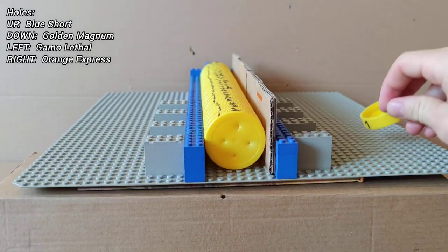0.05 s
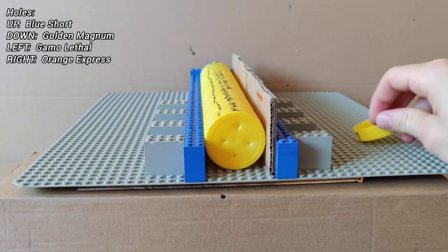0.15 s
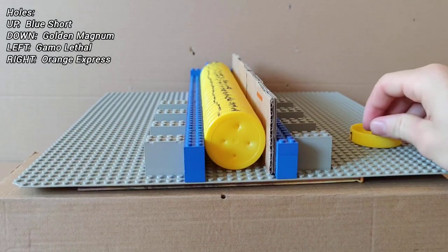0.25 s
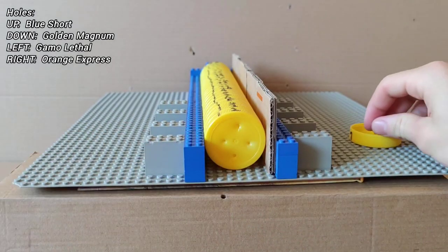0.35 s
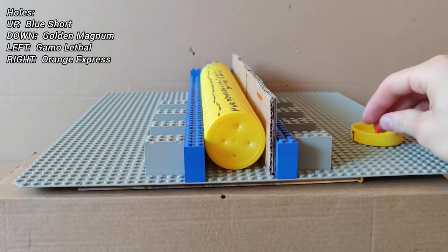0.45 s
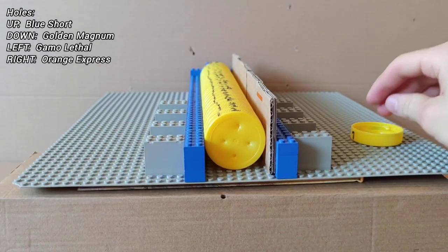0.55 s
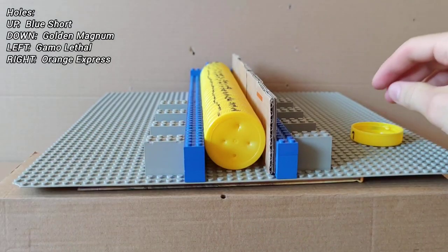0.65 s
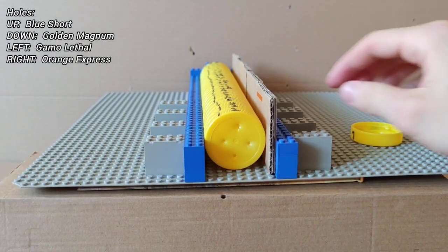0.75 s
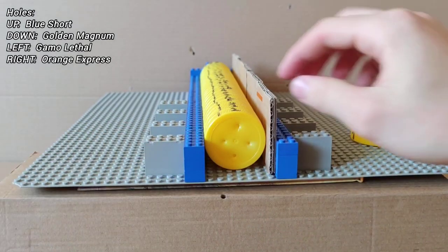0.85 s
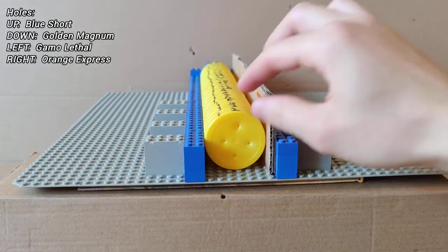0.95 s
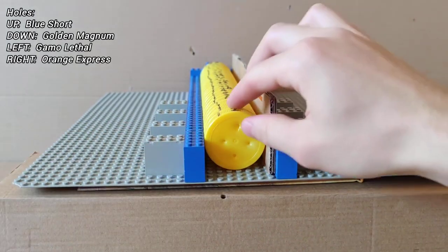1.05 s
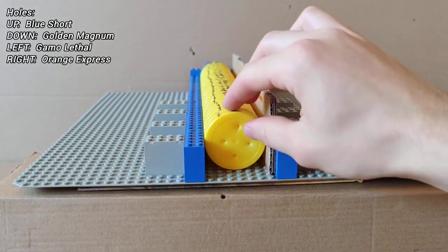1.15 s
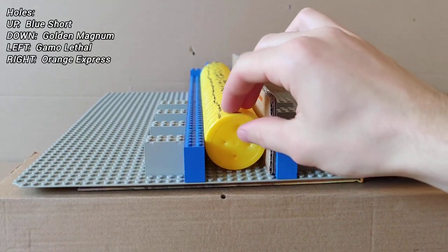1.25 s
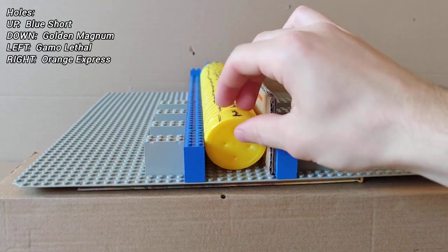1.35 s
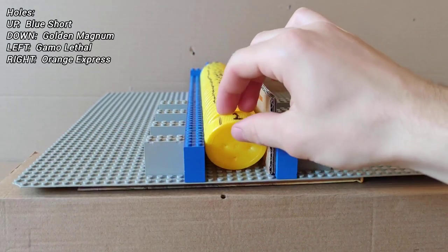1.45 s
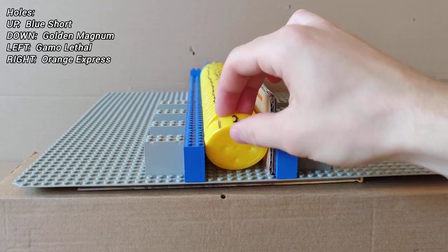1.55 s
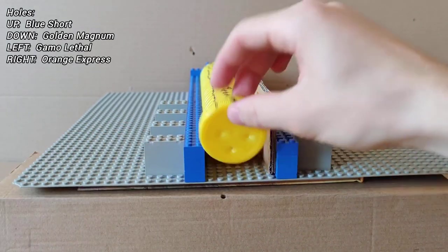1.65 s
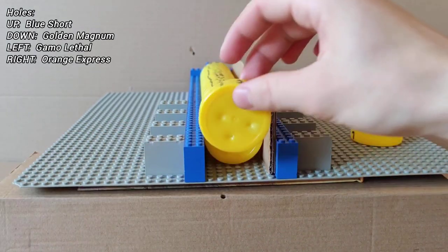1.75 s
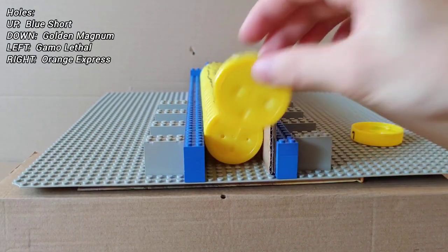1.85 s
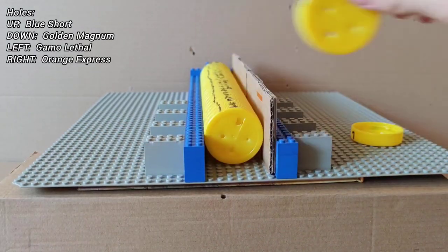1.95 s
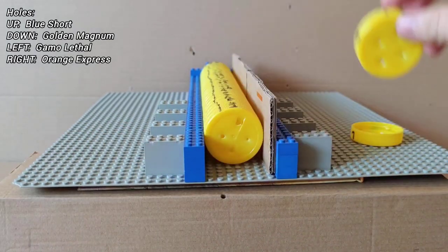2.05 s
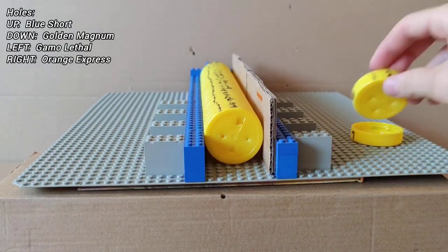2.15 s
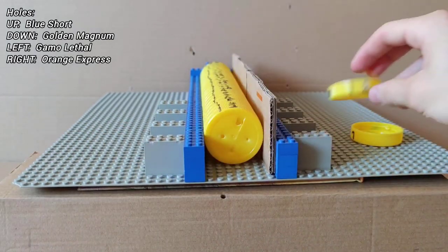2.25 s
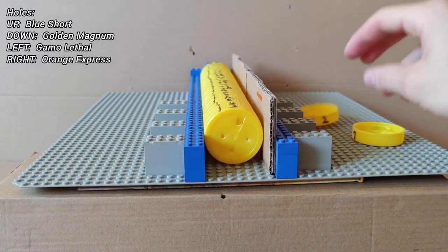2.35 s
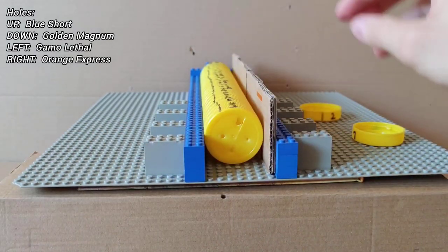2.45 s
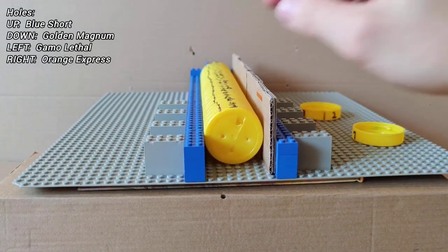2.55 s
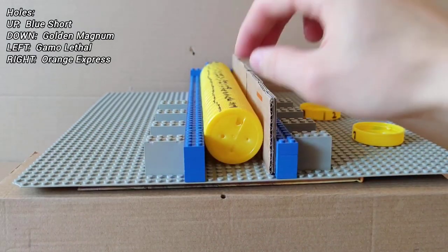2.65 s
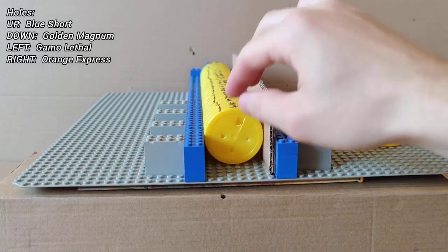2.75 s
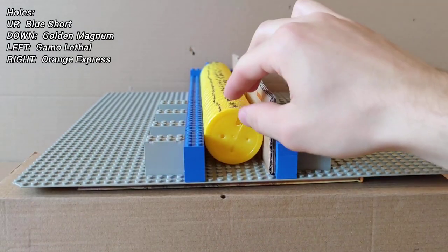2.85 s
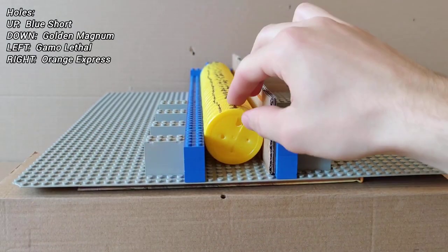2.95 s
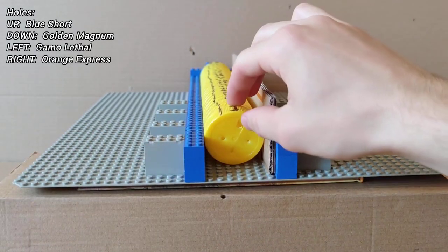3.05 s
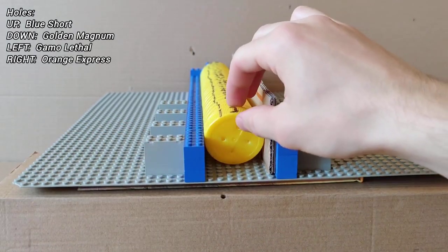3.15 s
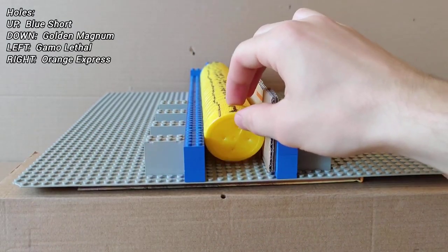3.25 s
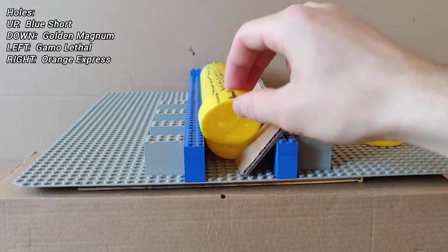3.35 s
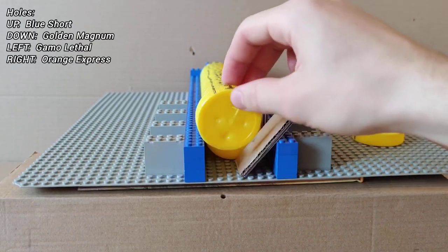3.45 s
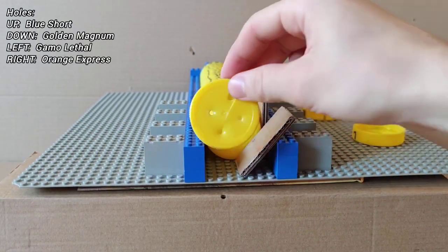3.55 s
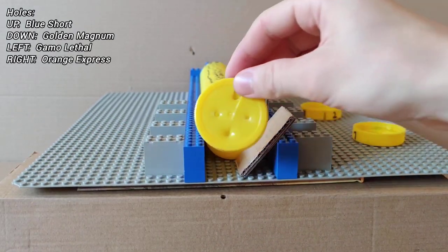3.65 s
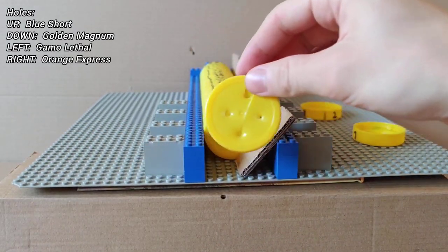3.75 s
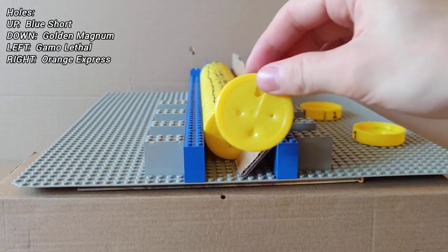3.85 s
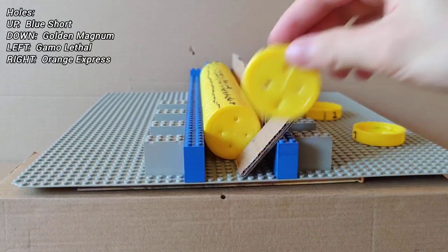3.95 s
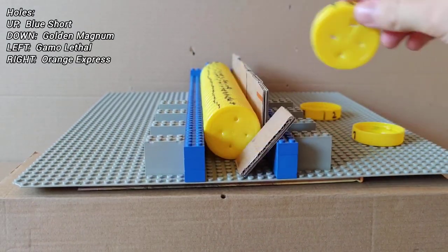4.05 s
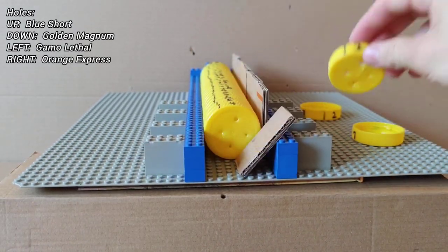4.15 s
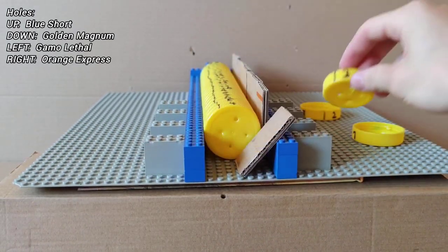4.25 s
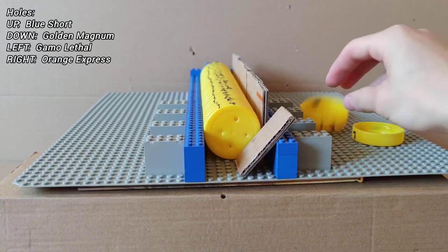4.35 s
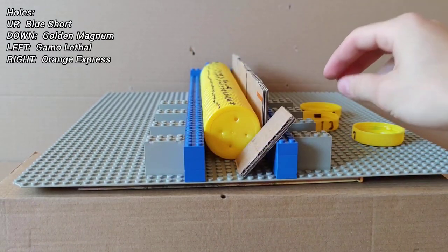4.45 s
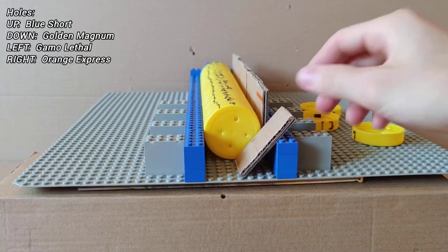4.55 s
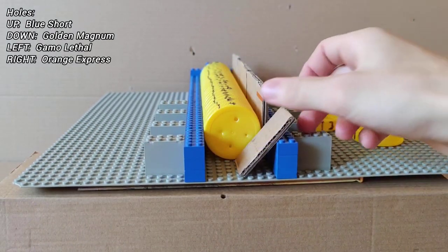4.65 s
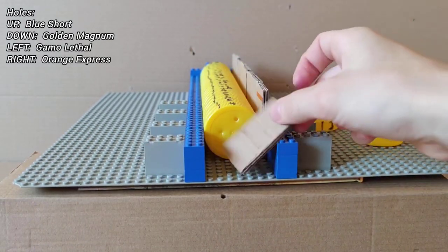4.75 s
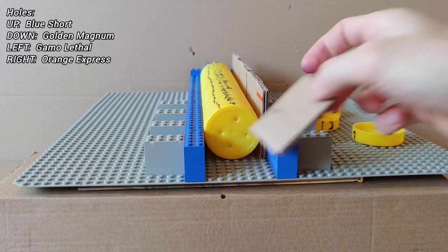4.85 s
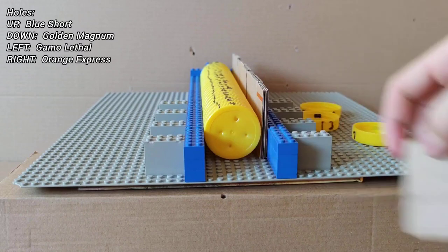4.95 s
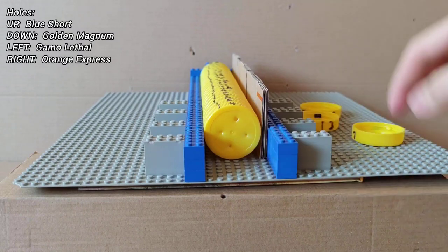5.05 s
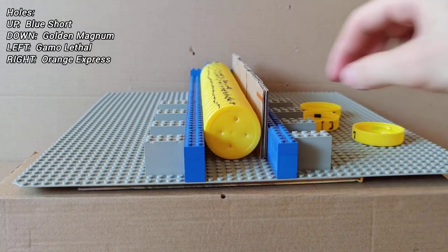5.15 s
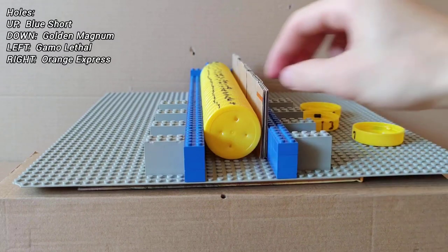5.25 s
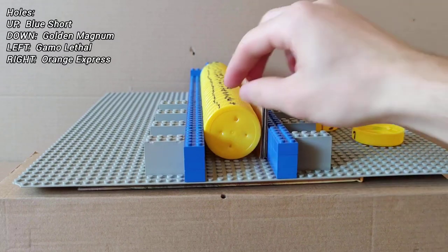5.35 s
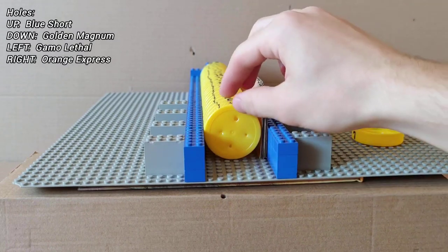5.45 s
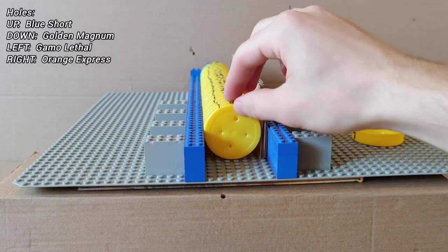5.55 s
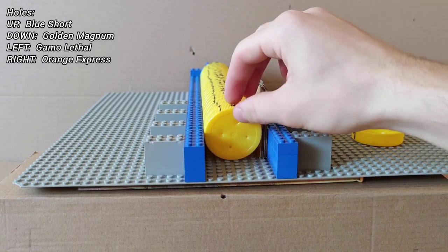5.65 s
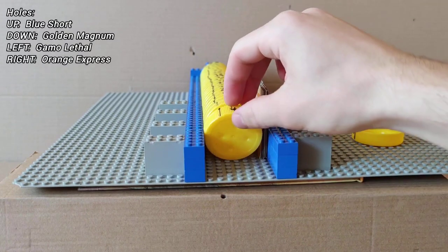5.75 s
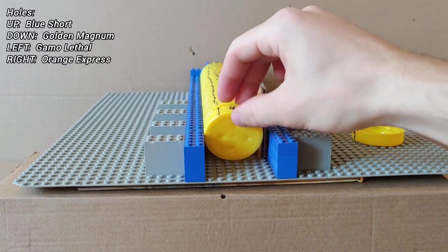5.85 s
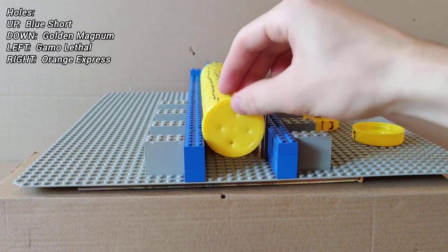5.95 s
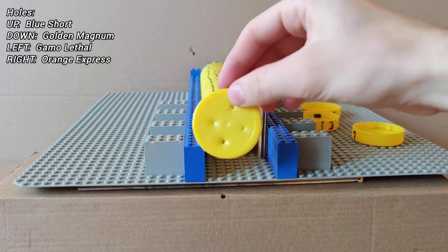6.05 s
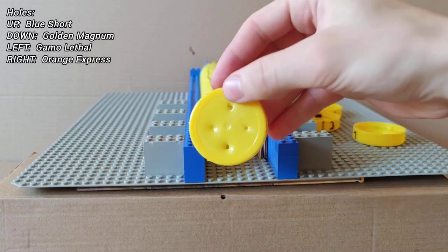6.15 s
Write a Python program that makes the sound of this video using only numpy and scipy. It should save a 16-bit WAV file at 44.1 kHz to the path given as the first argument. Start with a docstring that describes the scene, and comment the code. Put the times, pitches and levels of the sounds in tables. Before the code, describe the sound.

In a small, quiet room, light plastic caps land on a plastic baseplate three times, about two seconds apart, each with a bright, slightly hollow clatter. Between the landings come soft clicks and faint rubbing as fingers pull caps from a rack. Then something knocks and drags the stand of the nearby microphone, making dull, ringing thumps, and one more cap clicks and scrapes lightly over a faint steady hiss.

```python
"""Hard plastic caps, lifted from a rack by hand, drop on a plastic plate lying on a cardboard box.
Each contact rings cap, plate and box and ticks at the edge; rims scrape in grains, skin hisses along.
Something bumps and drags the camera stand, which thumps and rings. A small room answers.
The camera's two microphone ports differ in treble, over room murmur and their own hiss."""
import sys
import numpy as np
from scipy import signal
from scipy.fft import rfft
from scipy.io import wavfile
from scipy.ndimage import uniform_filter1d

SR = 44100
rng = np.random.default_rng(int(sys.argv[2]) if len(sys.argv) > 2 else 0)


def bounce(signal):
    """Save signal as a 16-bit WAV file at the path given by the first command-line argument."""
    frames = np.transpose(np.atleast_2d(signal))
    limited = np.clip(frames, -1, 1)
    pcm = np.round(limited * 32767).astype(np.int16)
    wavfile.write(sys.argv[1], SR, pcm)


N = 273861

# cap contacts, a few of them the quick echo of the hit before
# (time [s], cap ring [dB], hollow ring [dB], edge tick [dB], box thud [dB], contact [ms])
CONTACTS = [(0.2343, -25, -45, -14, -31, 1.1), (0.246, -33, -65, -35, -27, .8),
            (0.2814, -14, -23, 1, -25.5, 2.3), (0.2909, -18, -29, -5.5, -23.5, 1.9),
            (0.5541, -62, -64, -14, -57, 1.2), (0.5645, -54, -55, -11, -70, .8),
            (0.5676, -60, -46, -20, -69, .55), (0.5743, -50, -66, -28, -63, .8),
            (0.5817, -60, -75, -18, -65, .5), (0.6036, -60, -72, -24, -63, .9),
            (0.6172, -65, -76, -31, -75, .55), (1.3352, -63, -64, -53, -60, .5),
            (1.4055, -64, -56, -50, -61, .4), (1.6998, -40, -57, -36, -37, .4),
            (1.7082, -37, -52, -40, -38, 1.2), (1.7215, -29, -48, -32, -38, .5),
            (2.3647, -30.5, -46, -19, -32, 3), (2.3739, -20, -42, -12.5, -31, 1.9),
            (2.379, -12, -40, -2, -19, .55), (2.3865, -15, -38, -17, -25, .85),
            (2.3948, -16, -30, -9, -23, .4), (2.405, -25, -43, -12, -23, .7),
            (2.4169, -27, -39, -22, -29, .4), (2.4623, -28, -30, -13, -38, .55),
            (2.527, -32, -54, -36, -36, .6), (2.542, -36, -54, -24, -48, 2.2),
            (2.5554, -40, -58, -32, -38, .55), (3.113, -70, -87, -49, -63, .75),
            (3.155, -69, -76, -48, -56, 2.3), (3.35, -57, -54, -48, -47, .7),
            (3.3908, -55, -54, -46, -42, .4), (3.415, -36, -40, -29, -33, .8),
            (3.4413, -50, -64, -43, -55, .8), (3.464, -60, -70, -44, -60, .6),
            (4.4448, -13.5, -23, 1, -22, .9), (4.4551, -21, -30, -24, -41, 1),
            (4.462, -18, -30, -15, -27, .8), (4.8127, -60, -68, -50, -56, 1),
            (4.8262, -60, -81, -50, -55, .7), (4.8714, -58, -73, -45, -74, 2),
            (4.958, -62, -89, -45, -67, .7), (5.689, -75, -67, -61, -65, .55),
            (5.6969, -67, -76, -48, -66, .55), (5.7688, -23, -27, -14.5, -51, 1.4),
            (5.8255, -38, -48, -28, -63, .7), (5.8376, -38, -70, -30, -70, 3),
            (5.849, -44, -68, -37, -73, .5), (5.9277, -64, -59, -60, -66, .8),
            (5.9819, -68, -81, -58, -52, 1.9), (6.0356, -60, -64, -58, -44, 1.7),
            (6.0488, -50, -40, -45, -41, .6)]
# room send of contacts, mostly lowest while the hand covers the rack (start [s], level [dB])
CONTACT_SENDS = [(0, -1), (0.27, -4), (0.5, 1), (1.2, -11), (2.3, 11), (2.377, 0), (3., -8), (4.4, 2.5),
                 (4.7, 0), (5.6, -12), (5.8, -2), (6.043, -18)]
# finger and cap strokes (time [s], rise [s/20 dB], hold [s], fall [s/20 dB],
# cap scrape [dB], hollow rasp [dB], skin hiss [dB], box murmur [dB])
STROKES = [(0.515, .08, .015, .02, -82, -73, -82, -64), (1.25, .05, .25, .1, -86, -84, -85, -83),
           (1.4, .015, .01, .02, -82, -71, -76, -85), (1.632, .015, .045, .03, -74, -73, -68, -70),
           (1.69, .02, .05, .035, -63, -64, -70, -56), (2.47, .02, .01, .1, -47, -52, -53, -46),
           (2.525, .04, .035, .025, -52, -60, -55, -52), (3.04, .03, .08, .05, -84, -90, -81, -79),
           (3.15, .015, .025, .06, -80, -84, -68, -71), (3.3, .02, .04, .02, -79, -73, -72, -80),
           (3.352, .012, .04, .025, -72, -57, -68, -65), (3.405, .015, .05, .07, -58, -70, -60, -55),
           (4.812, .004, .015, .04, -76, -90, -76, -66), (5.03, .01, .02, .03, -90, -90, -69, -90),
           (5.125, .01, .03, .08, -74, -68, -70, -70), (5.262, .006, .05, .02, -84, -80, -56, -70),
           (5.41, .12, .07, .06, -67, -100, -66, -60), (5.685, .02, .015, .04, -83, -75, -77, -66),
           (5.79, .02, .07, .1, -64, -84, -69, -80), (5.925, .02, .025, .015, -82, -71, -71, -72),
           (5.982, .01, .015, .03, -90, -90, -84, -58), (6.04, .015, .012, .04, -74, -66, -76, -52)]
# stand jolts, a few of them the quick echo of the hit before
# (time [s], thump [dB], fizz [dB], width [ms])
JOLTS = [(5.1123, -14.5, -31, .36), (5.1237, -28, -43, .6), (5.1993, -42, -39, .4), (5.2127, -33, -56, .9),
         (5.2577, -37, -31, .55), (5.2718, -45, -46, .8), (5.284, -32, -44, .8), (5.3067, -34, -43, .5),
         (5.3404, -35, -38, .5), (5.3628, -34, -50, .55), (5.3938, -60, -48, .4), (5.4106, -35, -49, .45),
         (5.4265, -37, -51, .45), (5.4372, -42, -50, .6), (5.4678, -35, -46, .38)]
# modes (frequency [Hz], level [dB], t60 [s])
CAP_MODES = [(1150, -5, .007), (1650, -3, .006), (2080, 0, .012), (2500, -2, .009), (3000, -3, .007),
             (3520, -3, .007), (4150, -4, .008), (4750, -5, .007), (5250, -5, .01)]  # heavily damped walls
HOLLOW_MODES = [(1500, 0, .01), (2920, -13, .015)]  # air in the cap
RIM_MODES = [(4150, -8, .012), (5200, 0, .016)]
BOX_MODES = [(205.9, -3.5, 0.074), (280, -1, 0.07), (384.2, 4.5, 0.042), (483, 1, 0.03), (590, 4, 0.038),
             (756, 6, 0.027), (926, 13, 0.009)]  # plate and box together
STAND_MODES = [(60, -9, 0.21), (113.7, 2.5, 0.13), (193.6, -6, 0.16), (264, 4, 0.031), (450, -24, 0.079),
               (606, -5.5, 0.076), (716, -8, 0.13), (730, -15.5, 0.38), (890, -8.5, 0.14)]
# room decay (frequency [Hz], t60 [s])
ROOM_T60 = [(100, 0.44), (400, .3), (1500, 0.3), (5000, .26), (10000, 0.21), (16000, .2)]
# echoes off box top and walls (delay [ms], level [dB])
EARLY_ECHOES = [(1.6, -5.5), (11.3, -6.5), (17., -13.5)]
# left-right likeness (frequency [Hz], coherence [0..1])
ROOM_COHERENCE = [(100, 1), (250, 0.96), (450, 1), (800, 0), (1300, 0.11), (16000, 0.39)]
HISS_COHERENCE = [(20, .1), (300, 0.048), (1200, 0.1), (16000, 0.017)]
# microphone port responses (frequency [Hz], gain [dB])
LEFT_PORT = [(30, -34.5), (60, -11), (150, -2.5), (2500, 4.5), (4000, 6), (5900, -4.5), (7300, 1.5),
             (8300, 13), (9500, 7), (10500, 0), (13000, -6.5), (16000, -23.5)]
RIGHT_PORT = [(30, -30), (60, -12), (150, -1.5), (1600, 4.5), (3000, 6), (5000, 3.5), (6500, 2.5),
              (7800, -31), (9500, -2.5), (12000, -35.5), (13300, 0), (16000, -22.5)]
# noise floor (frequency [Hz], relative density [dB])
HISS_SPECTRUM = [(12, -62), (20, -6), (53, -1), (182, -7.5), (216, -10), (248, -9), (357, -12.5),
                 (422, -13.5), (1000, -19.5), (1090, -20), (1400, -19), (7310, -35.5), (14700, -28.5),
                 (16000, -26.5)]
# noise balance (frequency [Hz], left minus right [dB])
HISS_BALANCE = [(20, 1), (5000, -0.5), (7000, -2), (8300, 10.5), (10500, 4), (12000, 1.5), (16000, -2)]


def cap_knocks(size=3072):
    """Each contact rings the cap, ticks at its edge and pushes plate and box. Returns direct, send."""
    direct, send = np.zeros((2, 2, N))
    impulse = np.tile(signal.unit_impulse(size), (2, 1))
    tick = highpass(highpass(impulse, hz=4600), hz=4600)
    start_s, send_db = np.transpose(CONTACT_SENDS)
    for time_s, cap_db, hollow_db, tick_db, box_db, contact_ms in CONTACTS:
        blow = click_burst(contact_ms)
        parts = (cap_db, CAP_MODES), (hollow_db, HOLLOW_MODES), (box_db, BOX_MODES)
        body = sum(gain(db) * ring(modes, spread_hz=2500, size=size) for db, modes in parts)
        body = highpass(body, hz=135)  # keeps the knock free of deep bass
        edge = gain(tick_db) * (tick + gain(-27) * ring(RIM_MODES, spread_hz=2600, size=size))
        knock = signal.fftconvolve(body, blow[:1], axes=1) + signal.fftconvolve(edge, blow, axes=1)
        add(direct, time_s - contact_ms / 1000, knock)
        # room send is not coloured by the burst
        add(send, time_s, gain(send_db[start_s <= time_s][-1]) * (body + edge))
    return direct, send


def click_burst(swell_ms, size=1024):
    """A sharp click inside a short noise burst that swells and fades; unit energy."""
    age = np.arange(size) / SR * 1000 / swell_ms
    burst = rng.standard_normal((2, size)) * age * np.exp(1 - age)
    burst[:, round(swell_ms * SR / 1000)] = 2.5
    return burst / np.linalg.norm(burst, axis=1, keepdims=True)


def ring(modes, spread_hz, size=4096):
    """Struck body: modes vary by contact point; phase between ports spreads with pitch. Unit peak."""
    hz, db, t60_s = np.transpose(modes)[..., None]
    t = np.arange(size) / SR
    detune, strength, skew = rng.standard_normal((3, len(hz), 1))
    phase = 2 * np.pi * hz * (1 + .03 * detune) * t
    envelope = gain(db + 2.5 * strength - 60 * t / t60_s)
    out = np.array([(envelope * np.sin(phase + side * skew * hz / spread_hz)).sum(0) for side in (-1, 1)])
    return out / abs(out).max()


def rubs(grains_per_s=4000, grip_db=1.8, grip_s=.015):
    """Ridged rims slip in uneven grains that ring cap and box; skin hisses; grip pressure wavers."""
    sizes = gain(3 * np.minimum(rng.exponential(1, N), 4))
    grains = rng.standard_normal((2, N)) * sizes * (rng.random(N) < grains_per_s / SR)
    soft = uniform_filter1d(grains[:1], size=7)  # skin blunts each slip
    cap, hollow, box = (scrape(soft, modes) for modes in (CAP_MODES, HOLLOW_MODES, BOX_MODES))
    skin = unit_rms(highpass(.5 * unit_rms(grains) + rng.standard_normal((2, N)), hz=5000))
    waver = unit_rms(uniform_filter1d(rng.standard_normal(N), size=round(grip_s * SR)))
    t, levels = np.arange(N) / SR, np.zeros((4, N))
    for time_s, rise_s, hold_s, fall_s, *layer_db in STROKES:
        fade_db = -20 * np.maximum((time_s - t) / rise_s, (t - time_s - hold_s) / fall_s).clip(0)
        levels += gain(layer_db)[:, None] * gain(fade_db)
    return gain(grip_db * waver) * sum(level * x for level, x in zip(levels, (cap, hollow, skin, box)))


def scrape(grains, modes, spots=3):
    """Grains land on random spots, each ringing the body its own way."""
    spot, out = rng.integers(0, spots, N), np.zeros((2, N))
    for k in range(spots):
        response = ring(modes, spread_hz=1760, size=2048)
        out += signal.oaconvolve(grains * (spot == k), response, axes=1)[:, :N]
    return unit_rms(out)


def stand_bumps(half_size=400, skew_ms=.12, fizz_ms=2, ring_growth=1.3):
    """Each jolt dips, then pushes, right port first; the stand rings on. Returns thumps, fizz."""
    thumps, fizz = np.zeros((2, 2, N))
    t_ms = np.arange(-half_size, half_size) / SR * 1000
    side = np.array([[-1], [1]])
    for time_s, thump_db, fizz_db, width_ms in JOLTS:
        start_s = time_s - half_size / SR
        age = (t_ms + side * skew_ms) / width_ms
        jolt = (age + .45) * np.exp(.5 - age ** 2 / 2) * gain(1.2 * side)
        add(thumps, start_s, gain(thump_db) * jolt)
        ringing = signal.fftconvolve(ring(STAND_MODES, spread_hz=9000), jolt[:1], axes=1)
        ring_db = ring_growth * thump_db - .5  # hard jolts ring more than in proportion
        add(thumps, start_s, gain(ring_db) * ringing / abs(ringing).max())
        puff = highpass(rng.standard_normal(age.shape), hz=2700) * np.exp(-(t_ms / fizz_ms) ** 2 / 2)
        add(fizz, start_s, gain(fizz_db) * puff / abs(puff).max())
    return thumps, fizz


def room(send, tails=3, crossfade_hz=2.65, build_s=.008):
    """Early echoes, then a dense tail dying band by band; successive sounds meet different tails."""
    out, phase = np.zeros((2, N)), 2 * np.pi * crossfade_hz * np.arange(N) / SR
    for k in range(tails):
        hz, t, noise = signal.stft(rng.standard_normal((2, SR // 2)), SR, nperseg=256)
        decay = gain(-60 * t / curve(ROOM_T60, hz)[:, None])
        tail = signal.istft(stereo_pair(*noise, ROOM_COHERENCE, hz) * decay, SR, nperseg=256)[1]
        tail *= 1 - np.exp(-(np.arange(tail.shape[1]) / SR / build_s) ** 2)
        tail *= gain(-3.5) / np.linalg.norm(tail[0])
        for delay_ms, db in EARLY_ECHOES:
            add(tail, delay_ms / 1000, gain(db) * click_burst(swell_ms=.5))  # rough surfaces smear echoes
        share = np.sqrt(2 / tails) * np.cos(phase + k * np.pi / tails)
        out += signal.fftconvolve(send * share, tail, axes=1)[:, :N]
    return out


def mic_ports(air):
    """Each port colours the sound as a minimum-phase filter."""
    hz, responses = np.fft.rfftfreq(4096, 1 / SR), []
    for port in LEFT_PORT, RIGHT_PORT:
        db = curve(port, hz)
        log_gain = np.log(gain(np.r_[db, db[-2:0:-1]]))
        spectrum = np.exp(log_gain - 1j * signal.hilbert(log_gain).imag)
        responses.append(np.fft.ifft(spectrum).real[:len(hz)])
    return signal.oaconvolve(air, np.array(responses), axes=1)[:, :N]


def hiss(rms_db=-65.5, flicker_db=.8):
    """Room murmur and microphone noise, nearly unrelated between ports."""
    frames, hz = N // 256 + 5, np.fft.rfftfreq(1024, 1 / SR)
    re_a, im_a, re_b, im_b, flicker = rng.standard_normal((frames, 513, 5)).T
    flicker = unit_rms(uniform_filter1d(uniform_filter1d(flicker, size=20, axis=0), size=20, axis=1))
    spectra = stereo_pair(re_a + 1j * im_a, re_b + 1j * im_b, HISS_COHERENCE, hz)
    lean_db = curve(HISS_BALANCE, hz)[:, None] / 2
    shape_db = curve(HISS_SPECTRUM, hz)[:, None] + flicker_db * flicker
    spectra *= gain(shape_db + np.array([lean_db, -lean_db]))
    return gain(rms_db) * unit_rms(signal.istft(spectra, nperseg=1024, noverlap=768)[1][:, :N])


def stereo_pair(left, other, coherence, hz):
    """Two independent noise spectra to a partly coherent pair."""
    likeness = curve(coherence, hz)[:, None]
    return np.array([left, likeness * left + np.sqrt(1 - likeness ** 2) * other])


def gain(db):
    """Decibels to amplitude."""
    return 10 ** (np.asarray(db) / 20)


def unit_rms(x):
    """Scale to rms 1."""
    return x / np.sqrt(np.mean(x ** 2) + 1e-20)


def curve(points, hz):
    """Interpolate a table over log frequency."""
    point_hz, value = np.transpose(points)
    return np.interp(np.log(hz + 1), np.log(point_hz + 1), value)


def highpass(x, hz):
    """Fourth-order high-pass."""
    return signal.sosfilt(signal.butter(4, hz, "high", fs=SR, output="sos"), x)


def add(mix, time_s, sound):
    """Mix a stereo sound in at time_s."""
    part = mix[:, round(time_s * SR):][:, :sound.shape[1]]
    part += sound[:, :part.shape[1]]


def scene():
    """Caps, stand and room through the ports; direct fizz and hiss bypass them."""
    knocks, knock_send = cap_knocks()
    thumps, fizz = stand_bumps()
    rubbing = rubs()
    send = knock_send + gain(-7) * thumps + gain(-5.5) * fizz + gain(-8.5) * rubbing
    return mic_ports(knocks + thumps + rubbing + room(send)) + fizz + hiss()


def record(dry):
    """Band limit at 15.9 kHz."""
    lowpass = signal.firwin(255, 15900, window=("kaiser", 9), fs=SR)
    return signal.oaconvolve(dry, lowpass[None], "same")


dry = scene()
out = record(dry)
bounce(out)
```